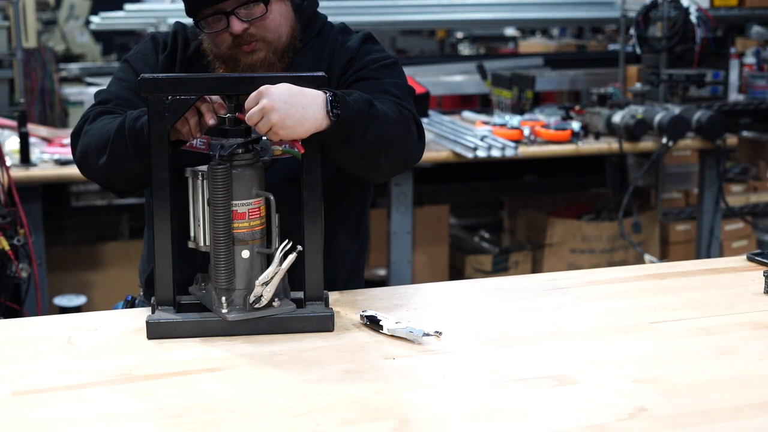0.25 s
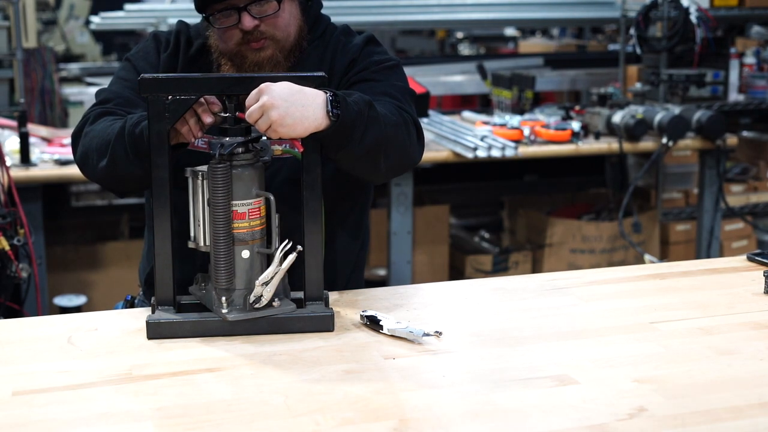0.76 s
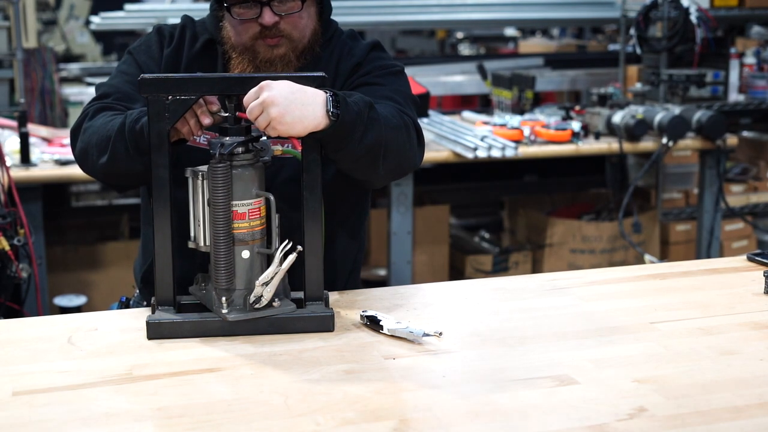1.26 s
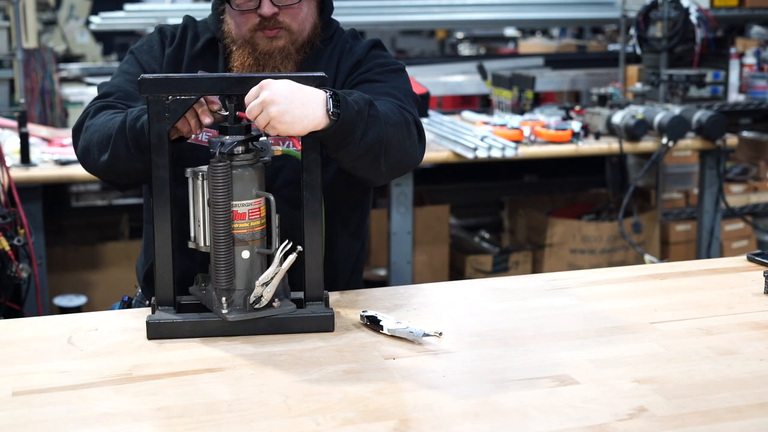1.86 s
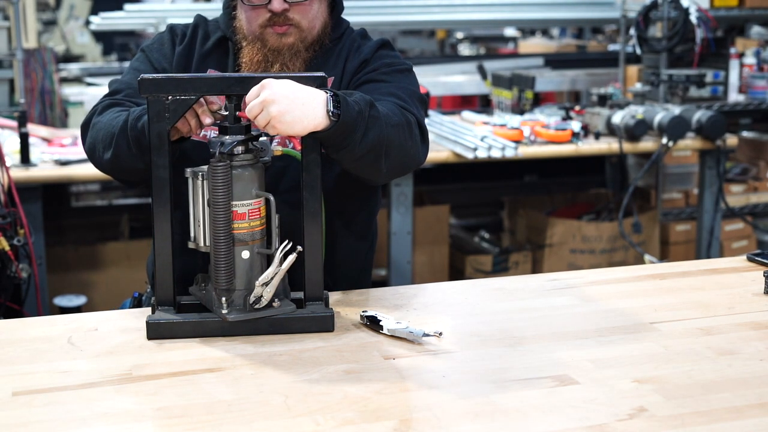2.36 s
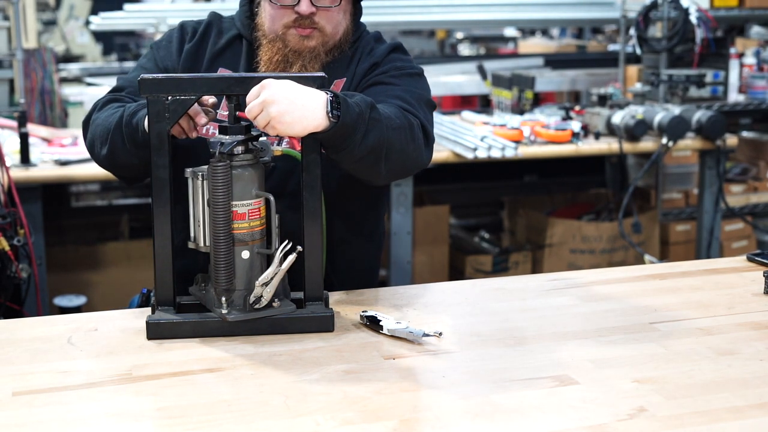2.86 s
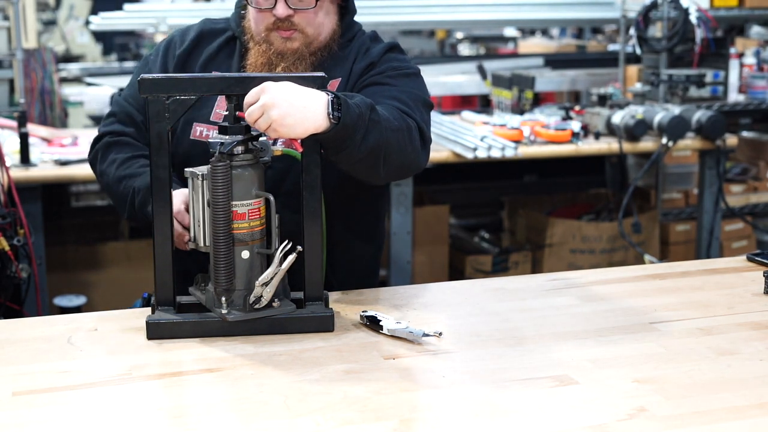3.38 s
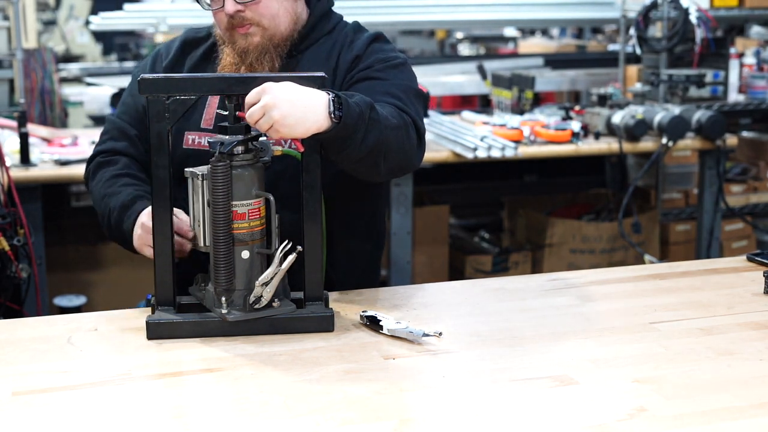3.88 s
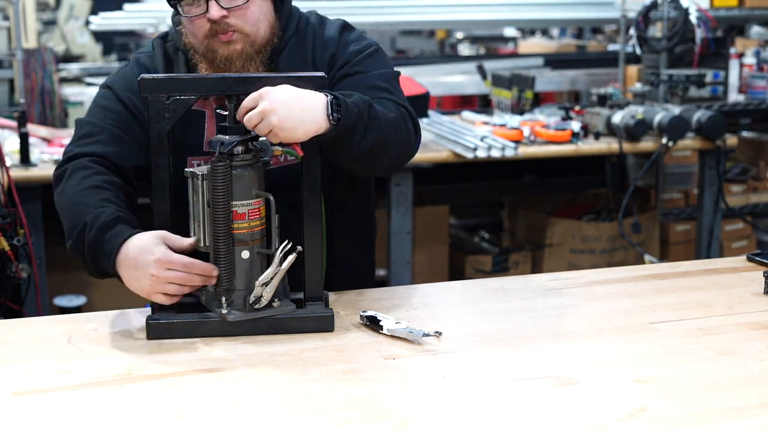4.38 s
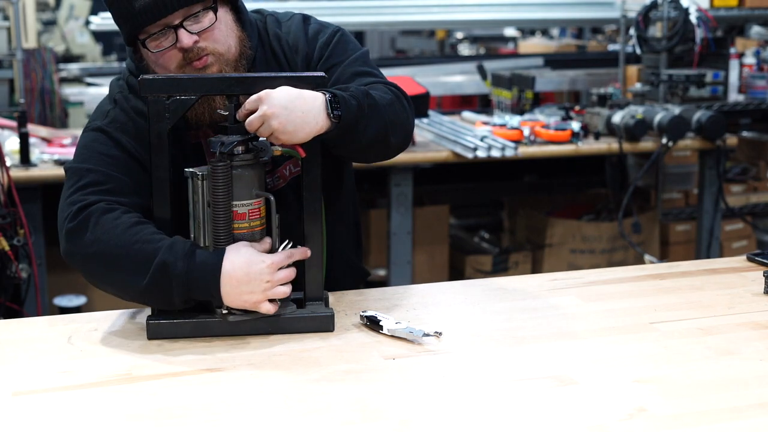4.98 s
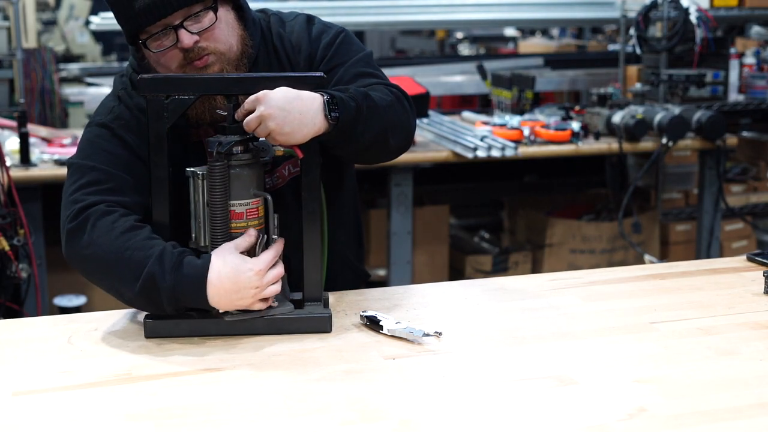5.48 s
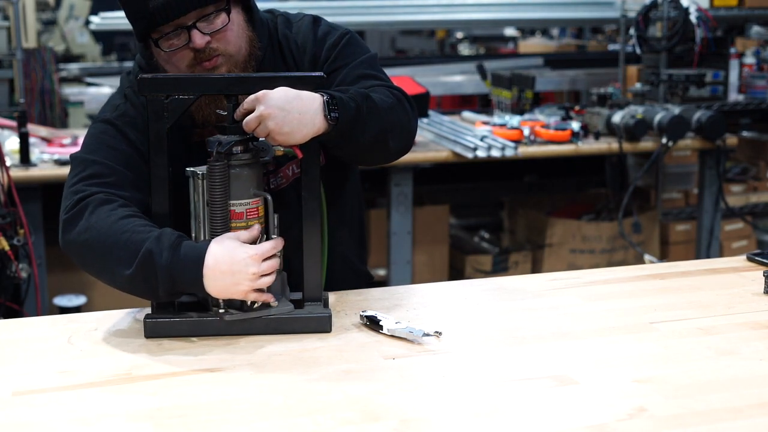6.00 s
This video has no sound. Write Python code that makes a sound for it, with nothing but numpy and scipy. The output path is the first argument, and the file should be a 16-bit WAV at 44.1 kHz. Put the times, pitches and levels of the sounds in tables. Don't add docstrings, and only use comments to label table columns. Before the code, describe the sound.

Rapid thumping air-pump strokes in two bursts on a workbench, a metallic rattle as they stall, a sharp air hiss, then faint cloth and skin rubs.

```python
import sys
import numpy as np
from scipy import signal
from scipy.fft import rfft, irfft
from scipy.io import wavfile
from scipy.ndimage import uniform_filter1d

SR = 44100
rng = np.random.default_rng(int(sys.argv[2]) if len(sys.argv) > 2 else 0)


def wav_record(signal):
    frames = np.transpose(np.atleast_2d(signal))
    bounded = np.clip(frames, -1, 1)
    quanta = np.round(bounded * 32767).astype(np.int16)
    wavfile.write(sys.argv[1], SR, quanta)


def gain_from_db(level_db):
    decades = np.asarray(level_db, float) / 20
    return 10 ** decades


N = 275184
T = np.arange(N) / SR

# exhaust opens_s, shuts_s, shutting thump_db (follows air pressure), shuttle snap (0-1), puff_db
STROKES = [(0.0347, 0.0654, -0.8, .95, -23.8), (0.127, 0.1577, -1.1, .95, -23.8),
           (0.22, 0.25, -0.2, .99, -20.9), (0.3126, 0.3427, -1.2, .99, -21.8),
           (0.4058, 0.4359, -2.4, 1, -21.5), (0.5005, 0.5303, -1.4, .6, -21),
           (0.5963, 0.6257, -1.9, .95, -21.4), (0.682, 0.7239, -0.4, .4, -36.3),
           (1.197, 1.2303, -1.8, 0, -9), (1.2966, 1.3259, -2.1, .95, -14.2),
           (1.3956, 1.4243, -3.3, .45, -10.8), (1.4948, 1.5234, -6.1, .1, -13.5),
           (1.5963, 1.6243, -6.5, 0, -15.9), (1.6989, 1.7246, -7.8, .05, -14.5),
           (1.8032, 1.828, -7.7, .1, -18), (1.9186, 1.9424, -14.8, .1, -18),
           (2.0541, 2.0775, -14.9, .15, -18.5), (2.2805, 2.3034, -18, 0, -24.6)]
# pitch_hz, level_db, time to die by 60 dB_s
BENCH = [(143, -17, 0.16), (260, -26.5, 0.47), (368, -24.5, 0.019), (482.4, -30.5, 0.077), (175, -14, 0.06),
         (94.7, -28, 0.011)]
# pitch_hz, level_db, time to die by 60 dB_s
FRAME = [(178, -14, .2), (1071, -46, 1.5), (1222, -23, .17), (181, -29, 1.2), (522, -32, .25)]
QUICK_S, SLOW_LOSS_DB = .0315, 13
STALL_DB, STALL_LOSS = -15, 6


def rms_one(x):
    return x / np.sqrt(np.mean(x ** 2) + 1e-20)


def low_pass(x, hz, order=2):
    return signal.sosfilt(signal.butter(order, hz, fs=SR, output="sos"), x)


def high_pass(x, hz, order=2):
    return signal.sosfilt(signal.butter(order, hz, "high", fs=SR, output="sos"), x)


def at_hz(points, hz):
    table_hz, values = np.transpose(points)
    return np.interp(np.log(np.maximum(hz, 1)), np.log(table_hz), values)


def drift(rate):
    r = np.exp(-2 * np.pi * rate / SR)
    return rms_one(signal.lfilter([1], [1, -2 * r, r * r], rng.standard_normal(N + SR))[SR:])


def coloured(spectrum, low_hz, high_hz, flicker_db):
    hz = np.fft.rfftfreq(N, 1 / SR)
    shape = gain_from_db(at_hz(spectrum, hz))
    inside = (hz > low_hz) & (hz < high_hz)
    shape = shape / np.sqrt(np.sum(shape[inside] ** 2) / len(hz))
    noise = irfft(rfft(rng.standard_normal(N)) * shape, N)
    return noise * gain_from_db(flicker_db * drift(220))


def patches(x, patchy_db):
    z = signal.stft(x, nperseg=256)[2]
    field = uniform_filter1d(rng.standard_normal(z.shape), size=3, axis=0)
    field = uniform_filter1d(field, size=5, axis=1)
    gain = gain_from_db(patchy_db * rms_one(field))
    return signal.istft(z * gain / np.sqrt(np.mean(gain ** 2)), nperseg=256)[1][:N]


def grains(per_s, size_db):
    sizes = gain_from_db(size_db * np.minimum(rng.exponential(1, N), 4)) * rng.choice([-1, 1], N)
    return sizes * (rng.random(N) < per_s / SR) + 1e-18


def swell(full_s, level_db, rise_s, fall, held_s=0., sag=0., order=1):
    t = T - full_s
    below = 40 * (np.maximum(-t, 0) / rise_s) ** order
    return gain_from_db(level_db - below - sag * np.clip(t, 0, held_s) - fall * np.maximum(t - held_s, 0))


def resonate(x, peaks):
    out = 0
    for k, (hz, width, level_db) in enumerate(peaks):
        r = np.exp(-np.pi * width / SR)
        poles = [1, -2 * r * np.cos(2 * np.pi * hz / SR), r * r]
        band = signal.lfilter([(1 - r * r) / 2, 0, (r * r - 1) / 2], poles, x)
        out = out + (-1) ** k * gain_from_db(level_db) * band
    return out


def sharp(x, peaks):
    return sum(resonate(resonate(x, [peak]), [(peak[0], 250 + 3 * peak[1], 0)]) for peak in peaks)


def strike(times, levels_db, modes, spread_db):
    out, at = 0, np.round(np.asarray(times) * SR).astype(int)
    chance = rng.standard_normal((len(at), len(modes)))
    for k, (hz, level_db, t60) in enumerate(modes):
        clicks = np.full(N, 1e-18)
        clicks[at] = gain_from_db(np.asarray(levels_db) + level_db + spread_db * chance[:, k])
        r, w = gain_from_db(-60 / (t60 * SR)), 2 * np.pi * hz / SR
        out = out - (-1) ** k * signal.lfilter([0, np.sin(w)], [1, -2 * r * np.cos(w), r * r], clicks)
    return out


def shop():
    # time_s, level_db
    loudness = [(0.0, -38), (0.8, -82), (0.88, -66), (1.12, -60.5), (1.2, -55.5), (3.3, -64), (3.4, -65.5),
                (4.71, -69), (5.98, -76.5), (6.24, -71.5)]
    # pitch_hz, level_db per Hz
    floor_noise = [(20, -37.5), (40, -14.5), (130, -2.5), (350, 1), (550, -5), (1200, -8.5), (4900, -18),
                   (16000, -34)]
    # pitch_hz, width_hz, level_db
    machine = [(150.7, 5, 0), (1071, 5, -2), (544, 8, -4), (1222, 6, -7)]
    hum = rms_one(resonate(rng.standard_normal(N), machine))
    level = gain_from_db(np.interp(T, *np.transpose(loudness)))
    return level * (coloured(floor_noise, 100, 2000, flicker_db=.4) + gain_from_db(-5) * hum)


def room(x):
    # pitch_hz, time to die by 60 dB_s
    decay = [(100, 0.36), (500, 0.16), (2000, 0.24), (5000, 0.25), (12000, 0.16)]
    t, tail = T[:SR // 2], 0
    edges = 60 * 2 ** np.arange(0, 8.1, .5)
    for low, high in zip(edges, edges[1:]):
        band_filter = signal.butter(2, [low, high], "band", fs=SR, output="sos")
        band = signal.sosfilt(band_filter, rng.standard_normal(len(t)))
        tail = tail + band * gain_from_db(-60 * t / at_hz(decay, np.sqrt(low * high)))
    tail = tail * np.clip((t - .004) / 0.0063, 0, 1)
    return signal.fftconvolve(x, tail / np.sqrt(np.sum(tail ** 2)))[:N]


def ticks():
    # start_s, peak_db, pitch_hz
    settling = [(2.2195, -48, 9800), (2.2435, -41, 6450), (2.2632, -56, 7000), (2.4995, -60, 8900),
                (2.5182, -61, 4500), (2.526, -60, 7900), (2.561, -44, 10000), (2.5655, -43, 7000),
                (2.5745, -41, 8000), (2.578, -36, 6000), (2.582, -17, 3500), (2.582, -36, 8150),
                (2.599, -37, 10180), (2.6055, -30, 3050), (2.622, -40, 5000), (2.659, -34.5, 10400),
                (2.668, -55, 9000), (2.690, -54, 8000), (2.6993, -43.5, 10500), (2.7212, -47.5, 4960),
                (2.7305, -50, 9430)]
    # start_s, peak_db, pitch_hz
    snaps = [(3.6916, -57.5, 2213), (3.8787, -50.5, 2525), (3.9334, -45.5, 2790), (3.972, -57, 3160),
             (4.103, -62, 7000), (4.152, -58, 4400), (4.171, -57, 3000), (4.251, -59.5, 6000),
             (4.2893, -56, 5020), (4.305, -49, 3200), (4.340, -51, 5610), (4.370, -42, 5250),
             (4.375, -47, 9000), (4.3975, -29.5, 5050), (4.409, -30, 3000), (4.412, -31, 9000),
             (4.4275, -31, 2500), (4.4275, -31, 6000), (4.436, -43, 2200), (4.442, -49, 3500),
             (4.467, -36, 6000), (4.471, -35, 1800), (4.499, -43, 4200), (4.499, -50, 8000),
             (4.531, -59, 5500), (4.5452, -52, 3500), (4.547, -52, 9000), (4.642, -42, 3100),
             (4.642, -52, 6200), (4.6943, -48, 2350), (4.7275, -46, 5540), (4.739, -57, 5800),
             (5.307, -54, 8500), (5.307, -59, 2490), (5.467, -60, 3000)]
    # start_s, peak_db, pitch_hz
    pings = [
        (4.8135, -58, 2040),
        (4.8135, -61, 6130),
        (4.8135, -59, 8900),
        (4.837, -59, 1982),
        (5.468, -56, 1160),
        (5.468, -61.5, 2050),
        (2.861, -60, 5900),
        (2.861, -64, 7700),
    ]
    out, t = np.zeros(N), T[:900]
    for rows, share in [(settling, 0.85), (snaps, 0.46), (pings, 0.021)]:
        for s, level_db, hz in rows:
            band = [(hz, np.clip(share, .02, 2) * hz, 0)]
            burst = rng.standard_normal(900) * np.exp(-t / 0.00022)
            tick = resonate(resonate(burst, band), band)
            at = round(s * SR)
            out[at:at + 900] += gain_from_db(level_db) * tick / np.abs(tick).max()
    return out


def thuds():
    # start_s, peak_db, pitch_hz
    landings = [(4.369, -52, 228), (4.714, -49, 300), (4.842, -60, 306), (5.08, -64.5, 321.7),
                (5.228, -56, 128), (5.329, -40, 66.8), (5.371, -46.5, 72.2), (5.5, -58.5, 302),
                (5.535, -55, 129), (5.672, -59.5, 135), (5.819, -60, 143), (5.972, -56, 143),
                (6.1017, -50.5, 280)]
    out = np.zeros(N)
    pat = resonate(rng.standard_normal(N), [(129, 25, 4.0), (322, 190, -0.5), (492, 220, -11.5)])
    pat = rms_one(low_pass(pat, 700))
    for s, level_db, hz in landings:
        pat_db = 1 + 9 * np.log2(hz / 140)
        at = round(s * SR)
        t = T[:N - at]
        swing = np.sin(2 * np.pi * hz * t) + gain_from_db(pat_db) * pat[at:]
        dying = gain_from_db(-60 * t / 0.15 * (hz / 140) ** 0.27)
        out[at:] += gain_from_db(level_db) * swing * (1 - np.exp(-t / 0.0048)) * dying
    return out


def scrapes():
    # start_s, end_s, level_db, from_hz, to_hz
    glides = [
        (4.114, 4.379, -70, 4300, 5150),
        (4.11, 4.25, -72.5, 2110, 2350),
        (4.49, 4.6, -72.5, 4700, 5000),
        (4.501, 4.6, -63.5, 2310, 3300),
        (4.702, 4.828, -71, 7500, 5800),
        (3.8, 4.095, -78, 3800, 4350),
    ]
    out, wobble = np.zeros(N), drift(330)
    for start, end, level_db, from_hz, to_hz in glides:
        span = slice(round(start * SR), round(end * SR))
        along = (T[span] - start) / (end - start)
        turns = np.cumsum(from_hz + (to_hz - from_hz) * along) / SR
        stroke = np.sqrt(np.abs(np.sin(np.pi * along)))
        out[span] += gain_from_db(level_db) * stroke * wobble[span] * np.sin(2 * np.pi * turns)
    return out


def sleeve():
    # loudest_s, level_db, rise_s, fall_db per s
    brushes = [
        (3.94, -65, 0.64, 302),
        (4.39, -55.5, 0.87, 63),
        (4.427, -39.5, 0.069, 224),
        (4.548, -57, 0.022, 279.5),
        (4.642, -62.5, 0.02, 796.5),
        (4.724, -62, 0.12, 108.5),
        (4.84, -70.5, 0.25, 901),
    ]
    # pitch_hz, level_db per Hz
    cloth = [(290, 5), (500, 2.5), (933, 8), (1190, 5), (4800, -4), (8450, -13.5), (16000, -16)]
    level = sum(swell(s, db, rise, fall) for s, db, rise, fall in brushes)
    crunch = resonate(grains(900, size_db=3.5), [(900, 900, -3), (2800, 2200, 0), (7000, 6000, -8)])
    hiss = level * gain_from_db(-9.0) * coloured(cloth, 1027, 10600, flicker_db=4.0)
    return hiss + level * rms_one(crunch) * np.clip(level / gain_from_db(-48.5), 0, 1) * gain_from_db(-5)


def skin_rubs():
    # full_s, held_s, level_db, fall_db per s
    rubs = [
        (5.081, 0.036, -52, 237),
        (5.288, .002, -47, 275),
        (5.507, 0.012, -50, 328),
        (6.099, 0.0025, -49, 700),
    ]
    # pitch_hz, width_hz, level_db
    grips = [
        [(893, 27, 5), (2370, 25, 2), (2910, 33, 4.5), (3200, 94, 5.5), (3630, 33, 7.5), (4200, 52, -1.5),
         (5260, 99, -8), (5800, 60, -11), (7100, 60, 0)],
        [(986, 34, 6.5), (1770, 320, -3), (2920, 27, 14.5), (3520, 150, 3), (4900, 40, -6), (3970, 58, 3),
         (7400, 60, -2), (5800, 93, -21), (6700, 88, 8.5)],
        [(990, 62, 14.5), (1550, 81, 9.5), (1850, 34, 8), (2040, 31, 9), (2960, 54, -6), (4840, 44, 2),
         (6550, 50, -8)],
        [(1040, 33, 21.5), (1815, 53, 13.5), (2000, 31, 11), (3500, 80, 0.5), (3950, 74, -5.5), (4780, 60, -6),
         (5250, 60, 1)],
    ]
    # pitch_hz, width_hz, level_db
    washes = [
        (3800, 6000, -5.5),
        (3200, 4100, -5.5),
        (1800, 2000, -4),
        (1000, 1200, -19),
    ]
    rise_s, out = 0.022, 0
    slips = grains(4000, size_db=3.0) * gain_from_db(2.5 * drift(40))
    for (s, held, db, fall), peaks, wash in zip(rubs, grips, washes):
        broad = resonate(slips, [wash])
        rub = rms_one(signal.lfilter([.5], [1, -.55], sharp(slips, peaks) + gain_from_db(-0.5) * broad))
        dull = low_pass(rub, 4200)
        out = out + swell(s, db, rise_s, fall, held, order=2) * dull
        out = out + swell(s, db - 1.5, rise_s, 1.14 * fall, held, order=2) * (rub - dull)
    return out


def spring():
    # full_s, held_s, level_db
    chatter = [
        (2.181, .002, -56),
        (2.396, .058, -35.5),
    ]
    # pitch_hz, width_hz, level_db
    coils = [(2210, 200, -1.5), (3060, 270, -1), (3600, 200, -11), (4244, 75, 11), (6000, 170, -29),
             (7360, 120, -29), (8800, 430, -36), (10500, 300, -29), (11400, 400, -21), (12500, 200, -25),
             (15300, 300, -28)]
    shaken = sum(swell(s, db, 0.0074, 1400, held) for s, held, db in chatter)
    return shaken * rms_one(sharp(grains(1500, size_db=3), coils))


def knocks():
    # start_s, peak_db, steel ring_db, bench boom_db, hardness_db
    hits = [(0.697, -8, -38.5, -9, -8), (1.1981, -6.5, -25, -12.5, 6), (2.1627, -34.5, -20, 8, 6),
            (2.1799, -13.5, -1, -15.5, -3), (2.391, -14.5, 3.5, -8, -0.5), (2.4317, -21.5, 5.5, 5, 8.5),
            (2.5493, -24.5, 7.5, 0, 6), (3.0831, -11, -38, -23, -31), (3.0972, -20.5, -35.5, -10, 7),
            (3.113, -22.5, -30, -42, 2), (3.2327, -39.5, -25, -4, 21)]
    s, level_db, ring_db, boom_db, hard_db = np.transpose(hits)
    hit = strike(s, level_db + hard_db, [(600, 0, .012), (1500, -6, .004), (3000, -17, .008)], spread_db=.5)
    soft = strike(s, level_db, [(327.0, -0.5, 0.017)], spread_db=4.0)
    low_modes = [(213, -16.5, 0.039), (322, -7.0, 0.068)] + BENCH
    boom = strike(s + 0.0032, level_db + boom_db, low_modes, spread_db=3.5)
    steel = strike(s, level_db + ring_db, FRAME, spread_db=1)
    latch = np.isclose(T, 2.582, atol=.4 / SR, rtol=0) * gain_from_db(-42 + 60)
    blows = hit + soft + boom + steel + resonate(latch, [(1235, 14, 0)])
    return high_pass(low_pass(blows, 5000), 110, order=4)


def check_valve():
    # full_s, held_s, level_db, rise_s
    songs = [
        (1.6, .57, -45, .9),
        (2.3, .11, -45, .08),
    ]
    tone = [(2045, 75, 0)]
    sings = sum(swell(s, db, rise, 300, held) for s, held, db, rise in songs)
    return sings * gain_from_db(-2) * rms_one(resonate(resonate(rng.standard_normal(N), tone), tone))


def supply_leak():
    # full_s, held_s, level_db, sag_db per s
    supplies = [
        (0.0, .76, -37, 5),
        (1.141, .85, -35, 12),
    ]
    # pitch_hz, level_db per Hz
    hiss = [(180, -45), (300, -15), (725, -5), (930, -13), (1120, -5), (6740, -5.5), (8360, -1.5),
            (16000, -13)]
    supply = sum(swell(s, db, .025, 500, held, sag) for s, held, db, sag in supplies)
    _, shuts, pressure_db = np.transpose(STROKES)[:3]
    last = np.maximum(np.searchsorted(shuts, T) - 1, 0)
    supply = supply * gain_from_db(20 * pressure_db[last] * np.clip(T - shuts[last], 0, .12))
    return supply * coloured(hiss, 2600, 10000, flicker_db=-2.5)


def hose_vent():
    # full_s, held_s, jet_db, hose_db, edge_db
    vents = [
        (0.751, 0.039, -32.5, -29, -37.5),
        (2.898, 0.33, -18, -27.5, -17),
    ]
    # sag_db per s while open, fall_db per s once shut
    emptying = [
        (29, 117.5),
        (-14.5, 265.5),
        (60.5, 307),
    ]
    # pitch_hz, level_db per Hz
    jet_colour = [(900, -49), (2000, -9), (2770, 4), (4200, 3), (6100, 4), (8000, 2), (11000, -20),
                  (16000, -51)]
    # pitch_hz, level_db per Hz
    edge_colour = [(4710, -30.5), (8000, 2), (12900, -5), (15200, -14), (16000, -22)]
    # pitch_hz, width_hz, level_db
    hose_modes = [(862, 500, -2.5), (1260, 200, 3), (1630, 620, -1.5)]
    # pitch_hz, width_hz, level_db
    nozzle = [(4400, 1200, 2.5), (2750, 340, -7.5)]
    rise_s, choke_after_s = 0.031, (0.068, 0.17)
    jet, ringing, edge = [sum(swell(s, db[k], rise_s, fall, held, sag, order=2) for s, held, *db in vents)
                          for k, (sag, fall) in enumerate(emptying)]
    rush = patches(coloured(jet_colour, 2500, 8000, flicker_db=1.0), patchy_db=2.5)
    first, final = [T - s - held - wait for (s, held, *_), wait in zip(vents, choke_after_s)]
    shut = np.where(T < 2, first, final)
    jet = jet * gain_from_db(-1300 * np.maximum(shut, 0) ** 2) * rush
    sings = sum(swell(s, db[0] - 9, rise_s, 180, order=2) +
                swell(s + held, db[0] - 28.5, 0.078, 98) for s, held, *db in vents)
    jet = jet + sings * resonate(rush, nozzle)
    edge = edge * patches(coloured(edge_colour, 6100, 15000, flicker_db=-0.5), patchy_db=2.0)
    hose = rms_one(resonate(resonate(rng.standard_normal(N), hose_modes), hose_modes))
    hose = high_pass(hose * gain_from_db(0.76 * drift(60)), 520, order=4)
    return jet + edge + ringing * hose


def pump_blasts():
    # pitch_hz, level_db per Hz
    blast_colour = [(55, -39), (100, 3), (255, 8.5), (556, -2.5), (1720, -5), (2270, -10.5), (7170, -11),
                    (16000, -24)]
    # pitch_hz, width_hz, level_db
    port = [(1780, 380, 2), (6500, 900, -18), (3720, 300, -14)]
    # pitch_hz, width_hz, level_db
    throat = [(1300, 450, 9), (1950, 400, 3)]
    # level_db at full pressure, dB per dB of pressure, dB won by full snap
    stages = [
        (-15.5, 1.6, -0.5),
        (-36, 0, 18.5),
        (-23.5, 0.27, 4.5),
        (-13.5, 1.18, -8),
    ]
    opens, shuts, thump_db, snap, _ = np.transpose(STROKES)
    stages_db = np.array([db + follows * thump_db + won_db * snap for db, follows, won_db in stages])
    stages_db[0] -= SLOW_LOSS_DB * (shuts - opens > QUICK_S)
    gate, closing, spent = np.zeros((3, N))
    rises = .0016 * gain_from_db(5 * np.maximum(STALL_DB - thump_db, 0))
    for a, b, rise, levels_db in zip(opens, shuts, rises, stages_db.T):
        fade = .0013 * gain_from_db(2.3 * max(-20.5 - levels_db[-1], 0))
        span = slice(int(a * SR), int((a + .4) * SR))
        t = T[span]
        level = gain_from_db(np.interp(t, [a + .002, a + .005, (a + b) / 2, b - .004], levels_db))
        opening = np.clip((t - a) / rise, 0, 1) ** (1 + (rise > .002))
        gate[span] += level * opening * np.exp(-np.maximum(t - b + .001, 0) / fade)
        closing[span] = np.exp(-np.abs(b - .003 - t) / .005)
        spent[span] = 1 - np.exp(-((t - a) / .012) ** 2)
    air = patches(coloured(blast_colour, 2900, 13000, flicker_db=1.5), patchy_db=3.0)
    air = air - high_pass(air, 7000) * np.clip(1 - (gate / gain_from_db(-25.5)) ** 0.3, -.3, 1)
    rumble = signal.sosfiltfilt(signal.butter(2, 750, fs=SR, output="sos"), air)
    air = air - .8 * spent * rumble
    lazy = np.interp(T, shuts, (1 - .7 * snap) * gain_from_db(np.minimum(thump_db - STALL_DB - 5, 0)))
    throat_bark = lazy * closing * resonate(air, throat)
    port_bark = gain_from_db(np.interp(T, opens, -5.5 + 8 * snap)) * resonate(air, port)
    return gate * (air + throat_bark + port_bark)


def pump_valve():
    # pitch_hz, level_db, time to die by 60 dB_s
    thump_modes = [(480, 4.2, .012), (130, -6.5, .028)]
    # pitch_hz, level_db, time to die by 60 dB_s
    puff_modes = [(462, 4, 0.013), (150, -3, 0.027), (930, -8.5, 0.012)]
    # pitch_hz, level_db, time to die by 60 dB_s
    clack_modes = [(1900, 1, .014), (3700, -4, 0.039), (5750, -6, .01), (7500, -4.5, .01)]
    opens, shuts, thump_db, snap, puff_db = np.transpose(STROKES)
    slow_db = SLOW_LOSS_DB * (shuts - opens > QUICK_S)
    stall_db = STALL_LOSS * np.maximum(STALL_DB - thump_db, 0)
    snappy = snap > .5
    knock_s = opens - np.where(snappy, .0028, .0078)
    knock_db = np.where(snappy, -14, -25) - slow_db / 2 - stall_db
    shuttle = strike(knock_s - .0014, knock_db + 3, [(540, 0, .022)], spread_db=.3)
    puffs = low_pass(strike(opens + .0004, puff_db - 1, puff_modes, spread_db=.5), 3000)
    clack_db = -30.5 + 19 * snap - slow_db - stall_db
    clack = strike(opens + 0.00095, clack_db, clack_modes, spread_db=2.0)
    thumps = strike(shuts - .0005, thump_db, thump_modes, spread_db=.3)
    return shuttle + puffs + clack + thumps


def pump_ringing():
    opens, shuts, thump_db, snap, puff_db = np.transpose(STROKES)
    hops = np.r_[0, shuts + .009, shuts + .0165, shuts + .024]
    hop_db = np.r_[-3, np.tile(thump_db, 3)] - np.minimum(22 * hops, 9)
    bounces = strike(hops, hop_db, [(660, -17, .055)], spread_db=1.5)
    loose_db = -1.5 * np.maximum(thump_db, -13)
    bounces = bounces + strike(shuts + .0115, thump_db + loose_db, [(1145, -25, .03)], spread_db=1.5)
    body_db = np.r_[-9, puff_db, thump_db - 7.5 * snap]
    body = strike(np.r_[0, opens, shuts], body_db, BENCH, spread_db=6.5)
    steel = strike(shuts, -23 + 0.25 * thump_db - 14 * (shuts < 1), FRAME, spread_db=3.5)
    return bounces + body + steel


def scene():
    air_line = high_pass(supply_leak() + hose_vent(), 220, order=4)
    pump = pump_blasts() + pump_valve() + pump_ringing() + check_valve()
    near = pump + air_line + knocks() + spring() + sleeve() + skin_rubs() + scrapes()
    small = ticks() + thuds()
    echo = gain_from_db(-16.5) * room(near + gain_from_db(-1.5) * small)
    return (near + small + echo + shop())[None]


def top_cut(x):
    return signal.sosfilt(signal.butter(12, 16830, fs=SR, output="sos"), x)


def record(dry):
    x = np.clip(high_pass(dry, 45), -1, 1)
    x = signal.sosfilt(signal.cheby2(10, 60, 16800, fs=SR, output="sos"), x)
    return top_cut(x)


dry = scene()
out = record(dry)
wav_record(out)
```